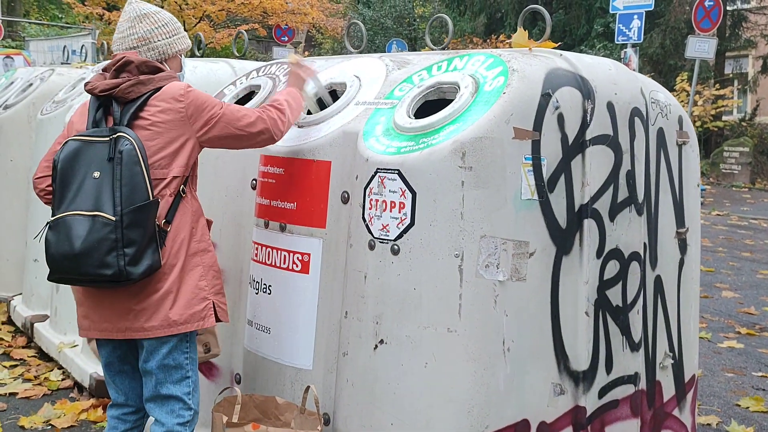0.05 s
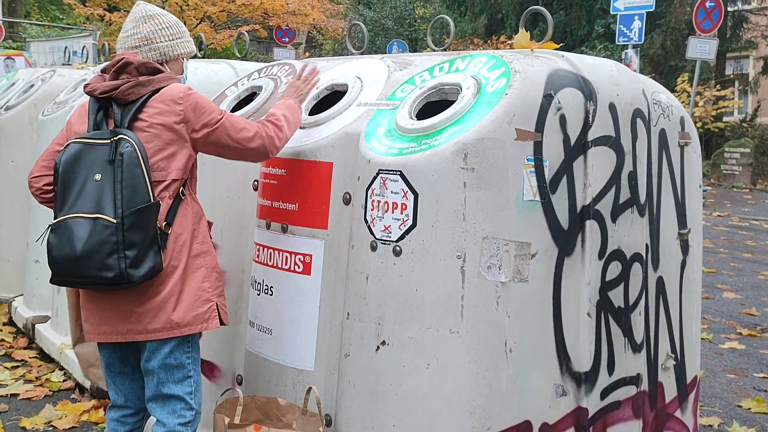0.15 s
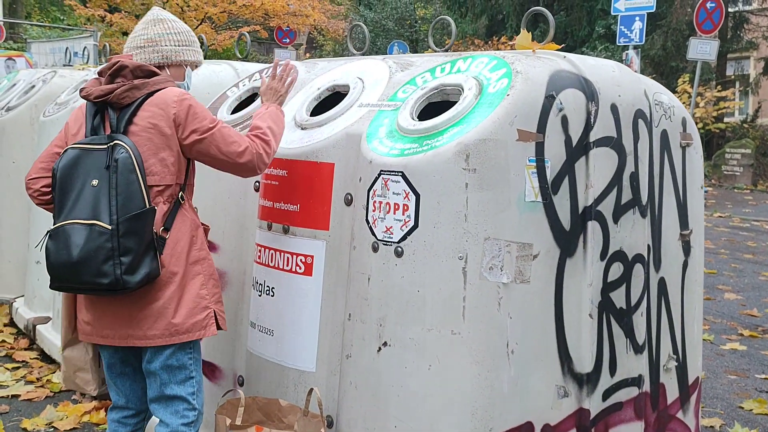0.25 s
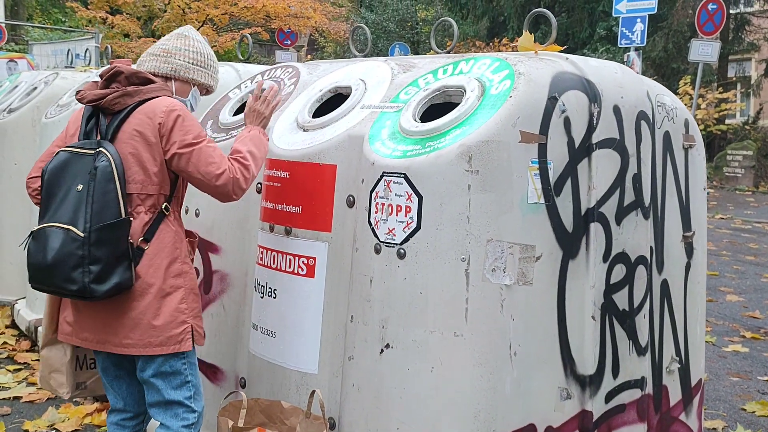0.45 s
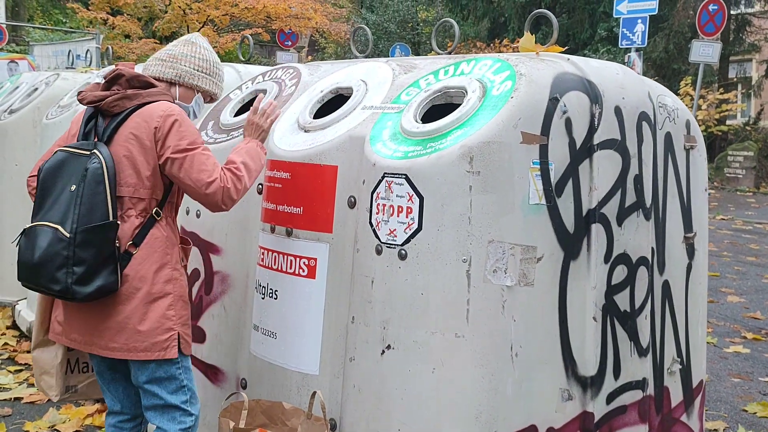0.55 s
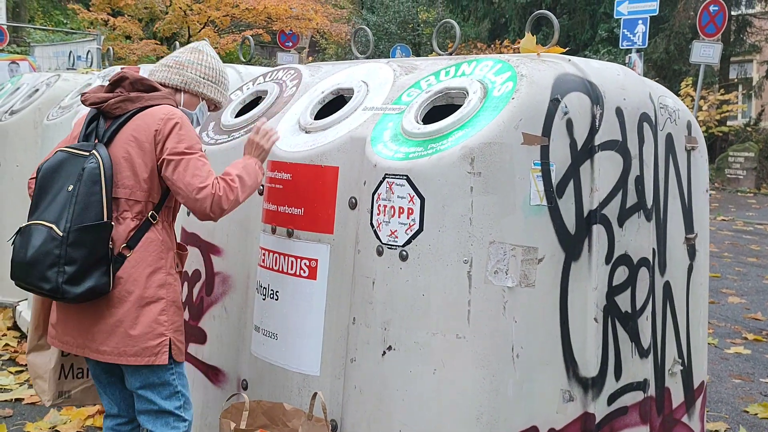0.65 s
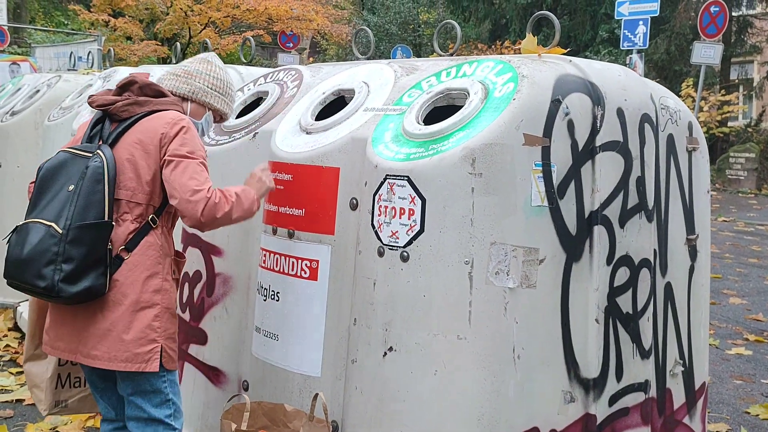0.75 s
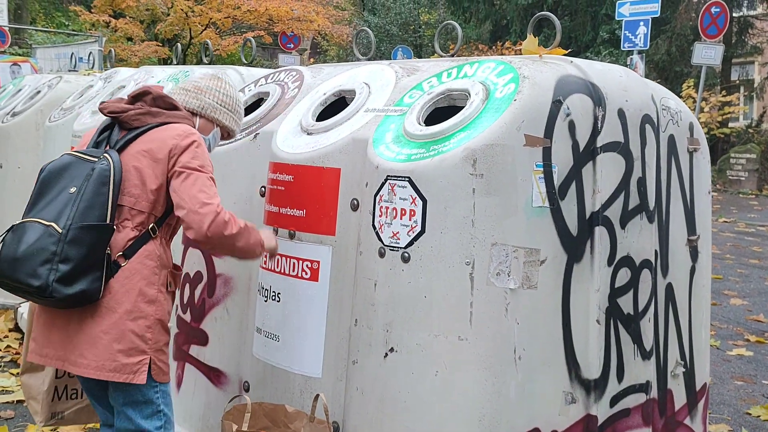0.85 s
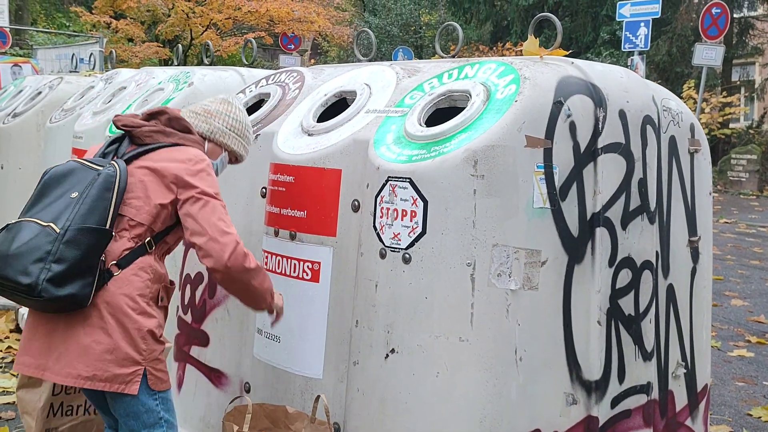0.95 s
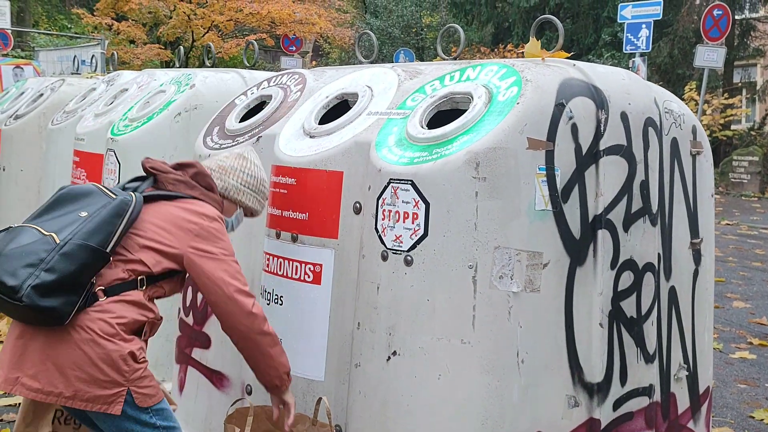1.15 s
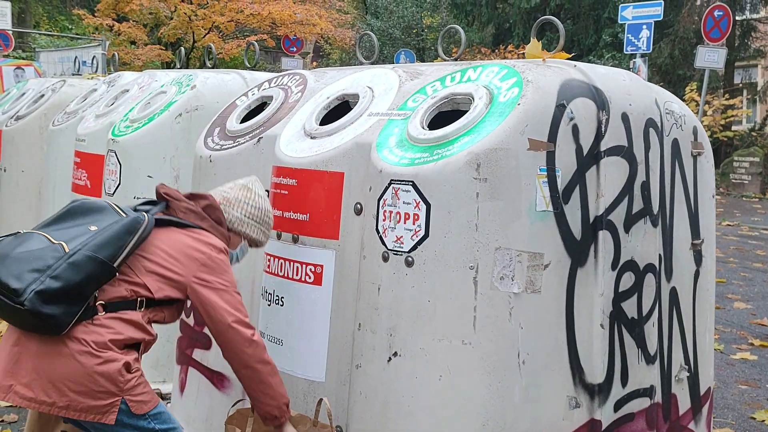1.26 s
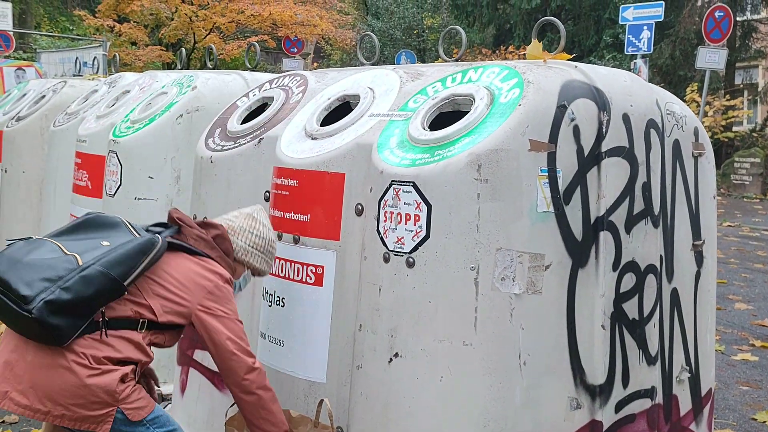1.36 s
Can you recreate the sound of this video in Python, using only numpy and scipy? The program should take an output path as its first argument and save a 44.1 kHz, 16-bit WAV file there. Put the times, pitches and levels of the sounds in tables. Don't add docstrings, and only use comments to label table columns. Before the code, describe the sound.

A glass bottle scuffs through a rubber flap, clinks brightly against other bottles, then thuds with a hollow boom in a street recycling container; small rattles and late clinks follow, close stereo microphone, faint traffic.

```python
import sys
import numpy as np
from scipy import signal
from scipy.fft import rfft, irfft, next_fast_len
from scipy.io import wavfile
from scipy.ndimage import map_coordinates

SR = 44100
rng = np.random.default_rng(int(sys.argv[2]) if len(sys.argv) > 2 else 0)


def pcm_store(signal):
    levels = np.round(np.clip(np.atleast_2d(signal), -1, 1) * 32767)
    wavfile.write(sys.argv[1], SR, levels.astype(np.int16).T)


def boost(x):
    u = np.asarray(x, float) / 20
    return 10 ** u


N = 61739
TOP_HZ = 15000
HALVES = np.array([[.5], [-.5]])

UPPER_MODES = { "neck": [(1630, -16, 0.15, -11), (2789, 0, 0.12, -4), (3070, -9, .04, 4),
               (3790, -8, 0.18, -2), (4700, -18, .12, -10), (5249, -29, .15, -4), (6500, -5.5, 0.045, -10),
               (7854, -25, .09, 5), (7340, -31, .09, 12), (8200, -19, 0.033, 24), (11560, -17, 0.081, 19),
               (13300, -15, 0.034, 3)], "tall": [(1277, -7, 0.086, 0), (2309, -4.5, 0.22, -12),
               (2557, 3, 0.074, -10), (4130, -0.5, 0.088, -11), (4527, 3, 0.099, -8), (5480, -24, .15, -6),
               (6890, -13, 0.098, 20), (7070, -2, 0.091, -10), (8830, -17, 0.05, 19),
               (10100, -22.5, 0.14, 8), (9022, -22, 0.033, 6), (11280, -17, 0.09, 8),
               (14000, -20, 0.091, 4)], "free": [(1499, -1, 0.61, -2), (2700, 7, 0.2, 5)],
               "flap": [(627, -5, 0.031, 6), (797, 4, 0.055, -4)], "round": [(2580, -10, 0.17, -4),
               (2702, -2, 0.12, 3), (3340, -3.5, 0.068, -2.5), (4000, -18, 0.1, -9), (4274, -23, 0.07, 3),
               (4730, -12, 0.087, -10), (5195, -31, .1, -4), (5830, -28, 0.14, -2), (6060, -8, 0.035, 2),
               (7063, -20.5, 0.43, -12), (7472, -20, 0.2, 4), (7957, -30, 0.069, 8), (9006, -28, 0.21, 10),
               (12700, -27, 0.11, 5)], }
LOWER_MODES = { "flask": [(2164, -12, 0.3, -4), (2309, -2, 0.12, -14), (2720, -1.5, 0.12, 4),
               (2980, 1.5, 0.036, -4), (3350, 6, 0.065, -1.5), (3690, -11.5, 0.054, -2),
               (4300, -12, 0.051, -6), (4645, -3, 0.053, -13.5), (5249, -31, 0.081, -6),
               (6800, -23, 0.072, -3), (8086, -25, .1, 8), (12130, -8.5, 0.064, 7)],
               "jar": [(1483, -4.5, 0.095, -2), (2350, -12, .15, 3), (2960, -12, 0.12, -7),
               (2930, -4.5, 0.075, 0), (3340, -6, 0.063, 15), (3690, 2, 0.074, -2), (4260, -10, 0.12, -10),
               (4730, -7, 0.12, -9.5), (5400, -8, .06, -8), (6702, -4, 0.09, -1), (7321, -18, 0.09, 0)],
               "small": [(1710, -3, 0.099, -5), (2353, -4, 0.12, -5), (2930, 2.5, 0.11, 4),
               (3270, 3.5, 0.067, -1), (3970, 7, 0.032, -8)], "stubby": [(2965, 1, 0.13, -6),
               (3400, -10, 0.16, 6), (4280, -1, 0.076, -8), (4870, -18, 0.091, -3), (5940, -10, .08, -2),
               (6870, -19, 0.09, 0)], "heavy": [(161.7, 4.5, 0.085, -0.5), (338, -6.5, 0.096, -4),
               (522, -6, 0.096, 1), (717, -9, 0.09, 0)], "low": [(1505, 4, 0.11, -8), (4030, -7, 0.064, 1)],
               "shard": [(7300, -4, 0.11, -8), (12000, -5, 0.032, 8)], }
# start_s, level_db, bottle or flap
CLINKS = [(0.3934, -21, "neck"), (.412, -25, "neck"), (.435, -24.5, "tall"), (.447, -26.5, "tall"),
          (.465, -20, "round"), (.473, -26.5, "round"), (.484, -38, "free"), (.2335, -29.5, "flap"),
          (.74, -59, "shard"), (.773, -39, "shard"), (.779, -30.5, "flask"), (.784, -33, "flask"),
          (0.79, -39.5, "flask"), (.803, -55, "flask"), (.83, -56, "flask"), (0.845, -36, "shard"),
          (0.891, -39, "low"), (0.909, -34, "jar"), (.915, -40.5, "jar"), (0.93, -44, "jar"),
          (1.018, -35.5, "small"), (1.028, -38.5, "stubby"), (1.019, -27, "heavy"), (1.036, -29.5, "heavy"),
          (1.099, -41.5, "low"), (1.11, -42.5, "low")]
DULL = ("heavy", "flap", "free")
# freq_hz, level_db, t60_s
SHELL_MODES = [(68.3, -9.5, 0.35), (105, 6.5, 0.096), (134.7, 4.5, 0.13), (196.5, 7, 0.093),
               (250, 2.5, 0.13), (334.4, -1.5, 0.16), (381.4, -0.5, 0.1), (490, -6, 0.087),
               (592.4, -2, 0.1), (754, -4, 0.097), (826, -10, 0.34)]
# start_s, level_db, contact_s, damping_factor
THUDS = [(0.233, -30.5, 0.00016, 1.34), (0.255, -39, 0.0014, 1.2), (.395, -37, 0.00057, 0.88),
         (0.472, -23, 0.0045, 1.22), (0.5944, -11, 0.0011, 1.45), (0.6017, -7.5, 0.0038, 6.9),
         (0.6095, -17, 0.00098, 1.8), (.63, -19, 0.0023, 2.1), (.655, -19, 0.0026, 1.9),
         (.695, -30.5, 0.0016, 1.5), (0.734, -37, 0.00031, 1.5), (.775, -32, 0.00044, 2.3),
         (0.902, -37.5, 0.00051, 1.03), (1.2, -35.5, .002, 2), (1.29, -37, 0.0036, 1.6), ]
# start_s, level_db, t60_s, tilt_db_per_octave
SCUFFS = [(0.2337, -22, 0.028, 1.9), (0.243, -29, .03, 1.5), (.2528, -22, 0.039, 0), (0.265, -37, 0.13, -1),
          (.391, -24, 0.12, -0.5), (0.408, -45, 0.029, 8), (.431, -28, 0.15, 1.5),
          (0.4652, -28, 0.039, 0.9), (0.594, -34, 0.16, 6.5), (0.607, -28, 0.08, -7),
          (0.772, -30.5, 0.068, 4.5), (0.784, -46.5, 0.15, 14), (.894, -38.5, 0.15, -2),
          (0.91, -39.5, 0.27, 1.5), (.95, -43, 0.094, -2), (1.017, -35.5, 0.06, -2.5),
          (1.036, -36, 0.066, -5), (1.102, -41, 0.12, -3.5), (1.192, -52.5, 0.11, 3.5)]
# freq_hz, density_db_per_hz
SCUFF_COLOUR = [(250, -1.5), (1430, -3), (4200, -11.5), (8000, -15.5)]
# time_s, level_db
SETTLING = [(0, -7), (0.219, -17), (0.272, -4.5), (.38, -3), (.55, 4), (.7, 0), (.85, 2), (0.971, -0.5),
            (1.1, -17), (1.25, -11), (1.4, -38)]
# freq_hz, density_db_per_hz
ROLL_COLOUR = [(25, -8.5), (50, -5), (130, -5), (300, -15), (800, -23), (1500, -30)]
# freq_hz, density_db_per_hz
STREET_COLOUR = [(25, -0.5), (60, 1), (110, -8), (350, -14.5), (850, -12), (2200, -15), (2800, -26),
                 (9000, -37), (15000, -26)]
# freq_hz, correlation
SCUFF_ROLL_ALIKE = [(60, 0.97), (240, 1), (940, -0.27), (3720, 0.12), (14700, -0.014)]
# freq_hz, correlation
STREET_ALIKE = [(60, 1), (240, 0.97), (900, 0.63), (3700, 0.088), (14000, .05)]
# freq_hz, t60_s
HOLLOW_DECAY = [(200, 0.026), (2500, 0.28), (12000, 0.11)]
# freq_hz, level_db
PORT = [(4800, 1.5), (5800, -5.5), (7200, 3), (9200, -10), (9700, -19), (10900, -16.5), (12000, -14.5),
        (15000, -30)]


def unit(x):
    return x / np.sqrt(np.mean(x ** 2) + 1e-20)


def along(points, hz):
    f, v = np.transpose(points)
    return np.interp(np.log(hz + 1), np.log(f + 1), v)


def wobble(rate_hz, size):
    knots = rng.standard_normal(int(size * rate_hz / SR) + 4)
    return map_coordinates(knots, [np.arange(size) * rate_hz / SR])


def add(track, start_s, x):
    part = track[..., round(start_s * SR):][..., :x.shape[-1]]
    part += x[..., :part.shape[-1]]


def rush(size, gain_db, alike, lag_s=0):
    hz = np.fft.rfftfreq(size, 1 / SR)
    turn = np.arccos(np.clip(alike(hz), -1, 1)) / 2
    gain = boost(gain_db(hz) + along(PORT, hz))
    spectra = rfft(rng.standard_normal((2, size))) * gain * [np.cos(turn), np.sin(turn)]
    mid, side = irfft(spectra, size)
    return unit(np.array([np.roll(mid + side, round(lag_s * SR)), mid - side]))


def minor_modes(count):
    level_db, t60_s = -6, .08
    u = rng.random((count, 3))
    hz = 3000 + 11500 * u[:, 0]
    mode_db = level_db + along(PORT, hz) - hz / 1900 - 8 * u[:, 1]
    return np.transpose([hz, mode_db, t60_s * (.5 + u[:, 1]), 12 * u[:, 2] - 6])


def clinks():
    chatter_depth, chatter_hz, chatter_s = .6, 260, .04
    rise_s, port_turn_rad = .002, 1.6
    out, t = np.zeros((2, N)), np.arange(SR // 5) / SR
    bottles = {**UPPER_MODES, **LOWER_MODES}
    for start_s, db, name in CLINKS:
        minor = minor_modes(0 if name in DULL else 24)
        for hz, level_db, t60_s, pan_db in [*bottles[name], *minor]:
            high = min(1, hz / 2500)
            phase = np.sign(rng.uniform(-0.84, 1)) * port_turn_rad * high * HALVES
            rough = wobble(chatter_hz, len(t)) + 1j * wobble(chatter_hz, len(t))
            chatter = 1 + chatter_depth * high * np.exp(-t / chatter_s) * rough
            ring = np.imag(np.exp(1j * (2 * np.pi * hz * t + phase)) * chatter)
            ring = ring * boost(-60 * t / t60_s) * (1 - np.exp(-t / rise_s))
            add(out, start_s, boost(db + level_db + pan_db * HALVES) * ring)
    return out


def hollow(x):
    hz, t, z = signal.stft(rng.standard_normal((2, SR // 3)), SR, nperseg=256)
    decay = boost(-60 * t / along(HOLLOW_DECAY, hz)[:, None])
    tail = signal.istft(z * decay, SR, nperseg=256)[1]
    return signal.fftconvolve(x, tail / np.linalg.norm(tail[0]), axes=1)[:, :N]


def thuds():
    out, t = np.zeros(N), np.arange(SR // 2) / SR
    for start_s, db, contact_s, damping in THUDS:
        boom = np.zeros(len(t))
        for hz, level_db, t60_s in SHELL_MODES:
            size = boost(level_db - 60 * t * damping / t60_s) / (1 + (hz * contact_s) ** 2)
            rise = 1 - np.exp(-t * hz / 0.47)
            boom -= size * np.sin(2 * np.pi * hz * t) * rise
        add(out, start_s, boost(db) * boom * (1 - np.exp(-t / contact_s)))
    return out


def scuffs():
    rise_s, hold_s, grit_db, grit_hz, least_alike = .003, .007, 3, 506.5, .4
    out, t = np.zeros((2, N)), np.arange(SR // 4) / SR

    def alike(hz):
        return np.maximum(least_alike, along(SCUFF_ROLL_ALIKE, hz))

    for start_s, db, t60_s, tilt_db in SCUFFS:
        def colour(hz):
            tilt = tilt_db * np.log2(hz / 2000 + 0.17)
            return along(SCUFF_COLOUR, hz) + tilt - 40 * (hz < 200)

        noise = rush(len(t), colour, alike)
        level_db = db + grit_db * wobble(grit_hz, len(t)) - 60 * np.maximum(t - hold_s, 0) / t60_s
        add(out, start_s, boost(level_db) * (1 - np.exp(-t / rise_s)) * noise)
    return out


def roll():
    noise = rush(N, lambda hz: along(ROLL_COLOUR, hz), lambda hz: along(SCUFF_ROLL_ALIKE, hz))
    return unit(boost(0.74 * wobble(24.4, N)) * noise)


def rattle():
    centre_hz, spread, cycles, size_db = 3454, .55, 45, 1.5
    grains_per_s, used_per_s = 2500, 3100
    draw = rng.random((round(grains_per_s * N / SR), 5))
    hz = centre_hz * np.exp(spread * rng.standard_normal((len(draw), 1)))
    k = np.arange(700)
    onset = k / 30 / (1 + k / 30)
    grain = np.sin(2 * np.pi * hz * k / SR) * onset * np.exp(-4 * hz * k / SR / cycles)
    grain = grain * (hz < TOP_HZ) * (draw[:, 4:] < used_per_s / grains_per_s)
    grain = grain * boost(along(PORT, hz) - size_db * np.log(draw[:, 1:2]))
    place = ((draw[:, :1] * N).astype(int) + k).ravel()
    sides = []
    for c in (2, 3):
        weighted = grain * (2 * draw[:, c:c + 1] - 1)
        sides.append(np.bincount(place, weighted.ravel(), N + len(k))[:N])
    return unit(np.array(sides))


def heap():
    roll_db, rattle_db = -40, -49
    activity = boost(np.interp(np.arange(N) / SR, *np.transpose(SETTLING)))
    return activity * (boost(roll_db) * roll() + boost(rattle_db) * rattle())


def street():
    level_db, sway_db, lag_s = -39, .6, .00036
    sway = wobble(1.4, N) + wobble(11.7, N)
    hum = rush(N, lambda hz: along(STREET_COLOUR, hz), lambda hz: along(STREET_ALIKE, hz), lag_s)
    return boost(level_db + sway_db * sway) * hum


def scene():
    hollow_db, lean_right_db = -7, .6
    glass = clinks()
    mix = glass + boost(hollow_db) * hollow(glass) + thuds() + scuffs() + heap() + street()
    return mix * boost(-lean_right_db * HALVES)


def top_cut(x):
    return signal.sosfilt(signal.butter(12, 15000, fs=SR, output="sos"), x)


def record(dry):
    size = next_fast_len(N + 4096)
    passed = np.fft.rfftfreq(size, 1 / SR) < TOP_HZ
    mix = irfft(rfft(dry, size) * passed, size)[:, :N]
    return top_cut(mix)


dry = scene()
out = record(dry)
pcm_store(out)
```